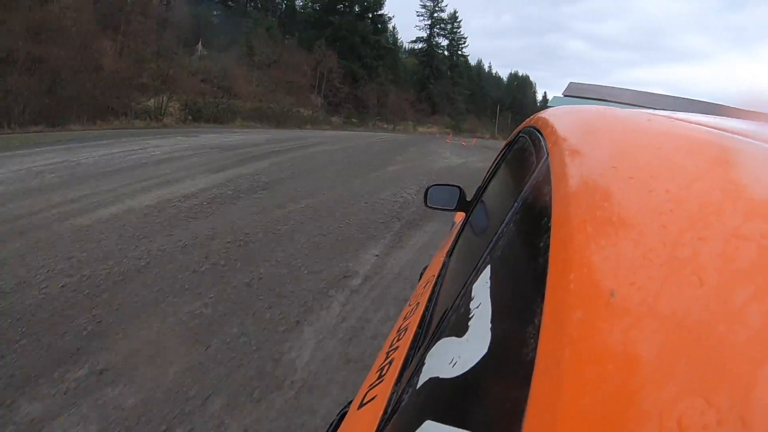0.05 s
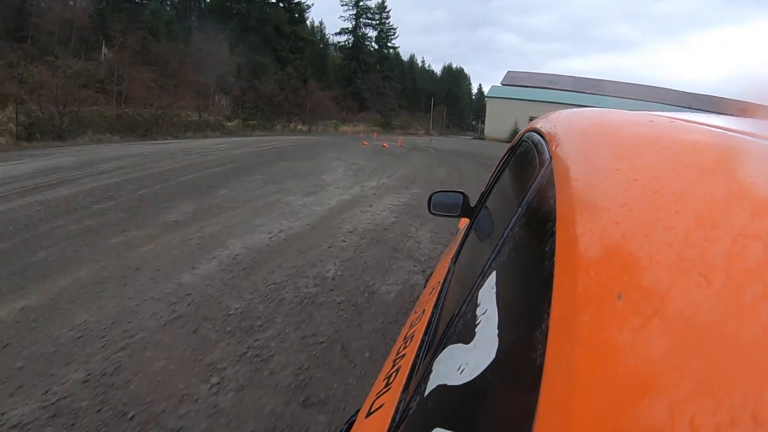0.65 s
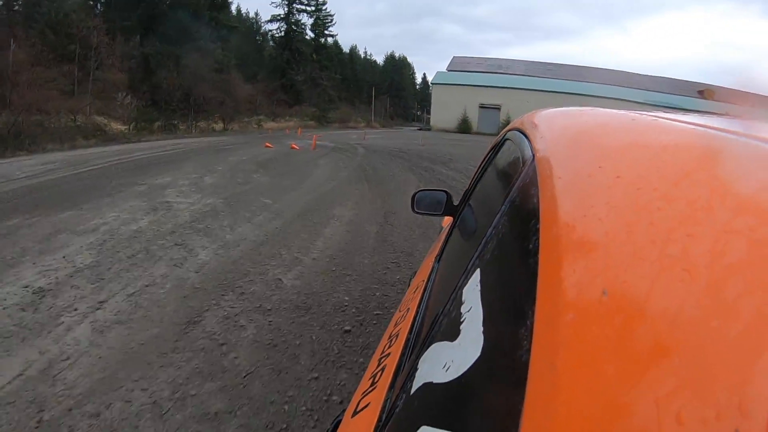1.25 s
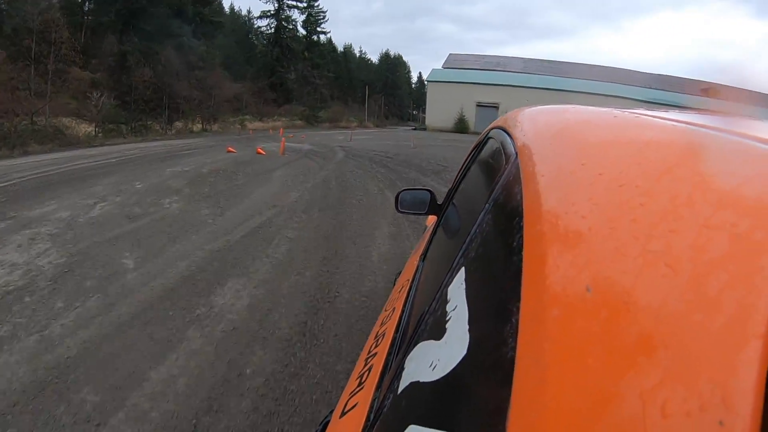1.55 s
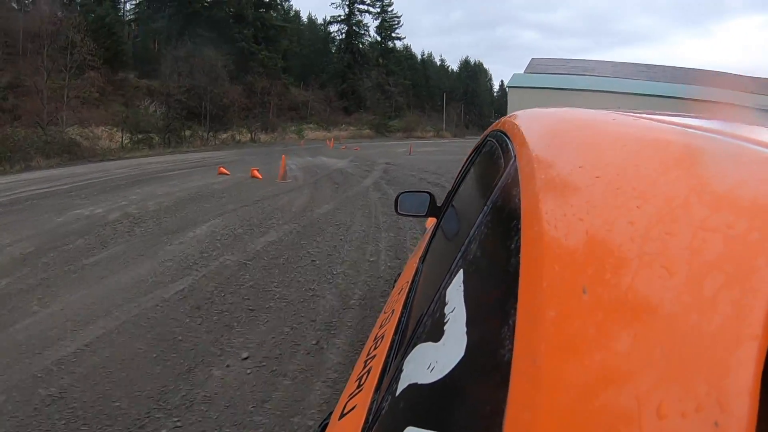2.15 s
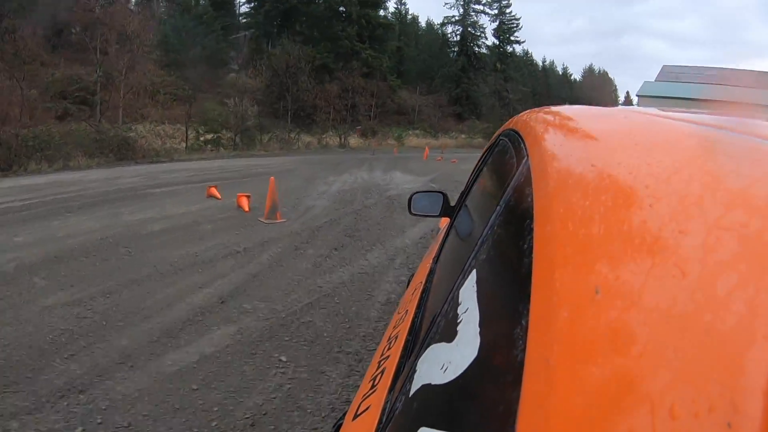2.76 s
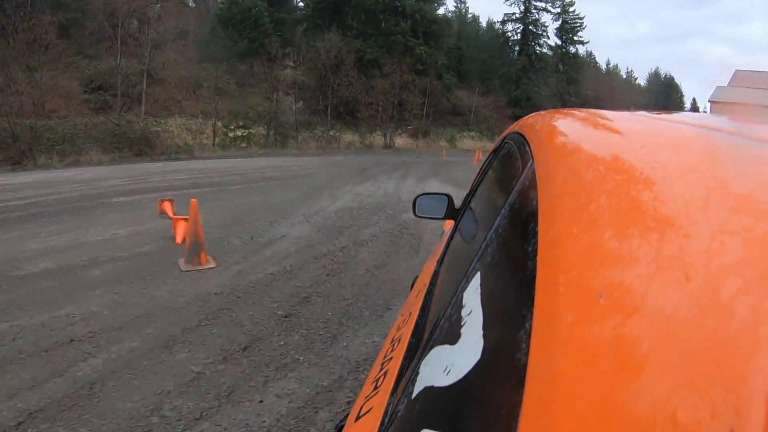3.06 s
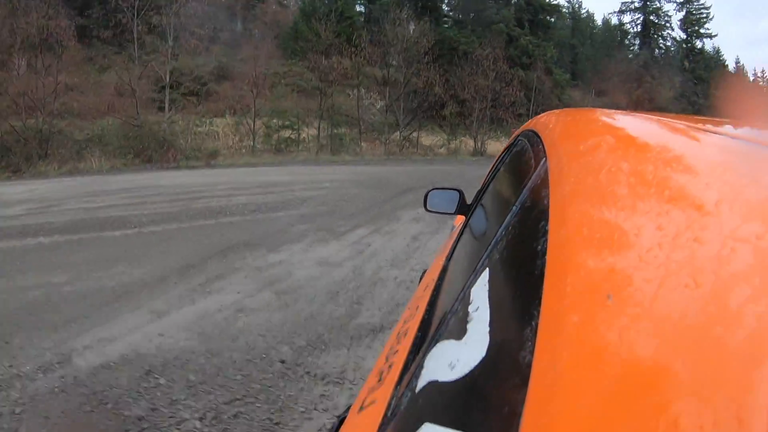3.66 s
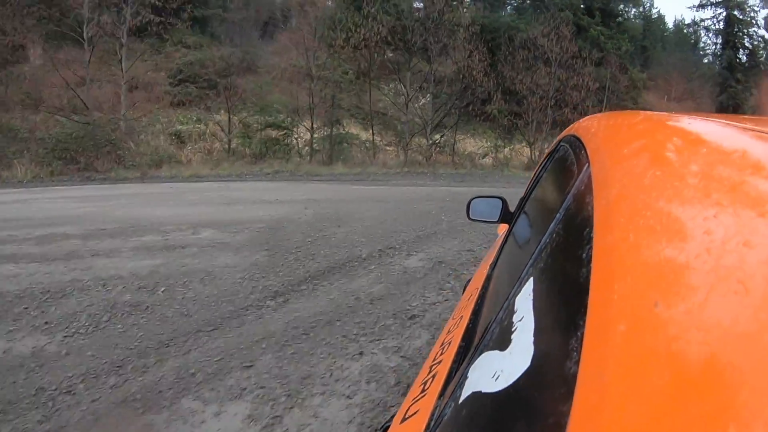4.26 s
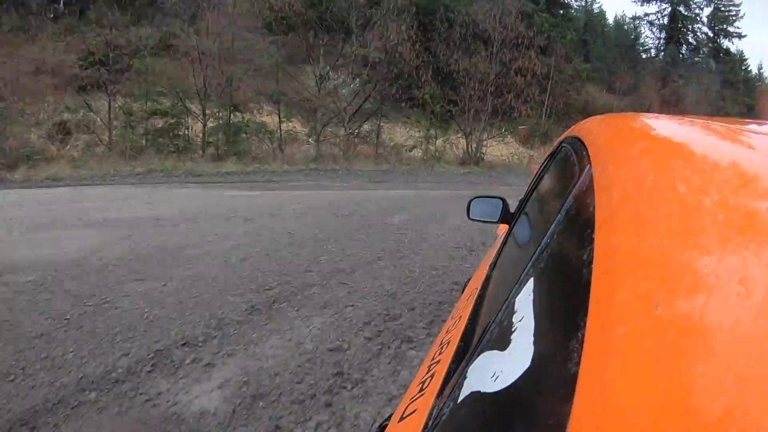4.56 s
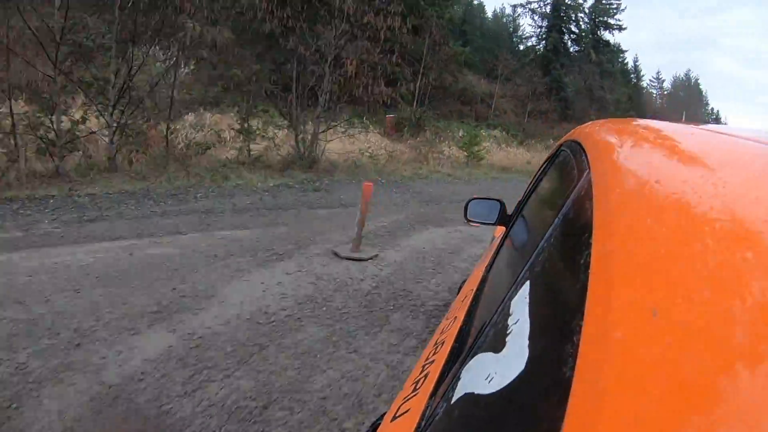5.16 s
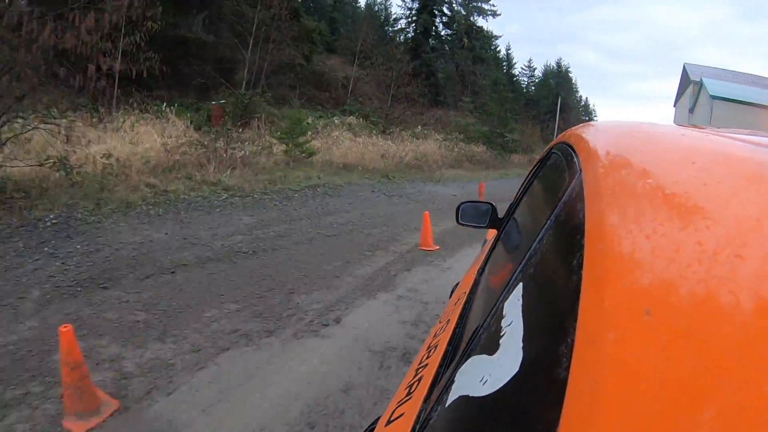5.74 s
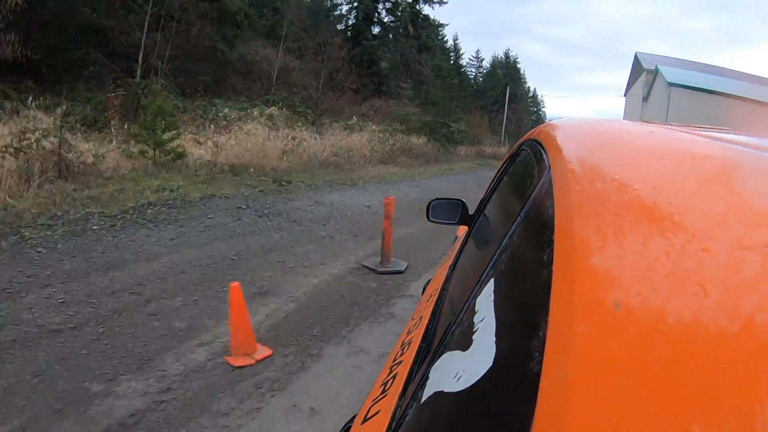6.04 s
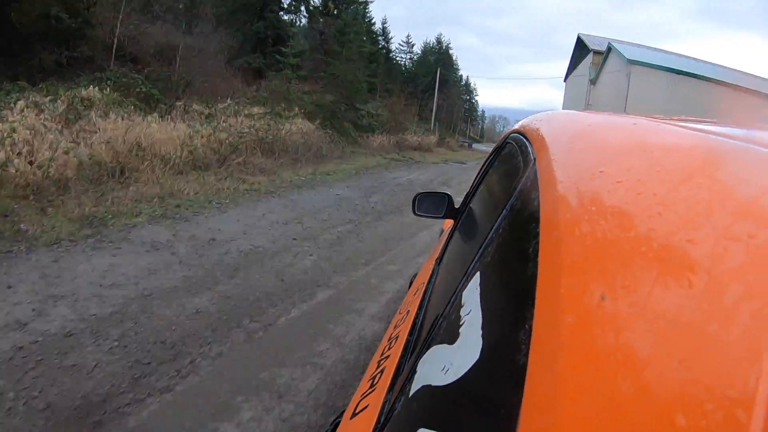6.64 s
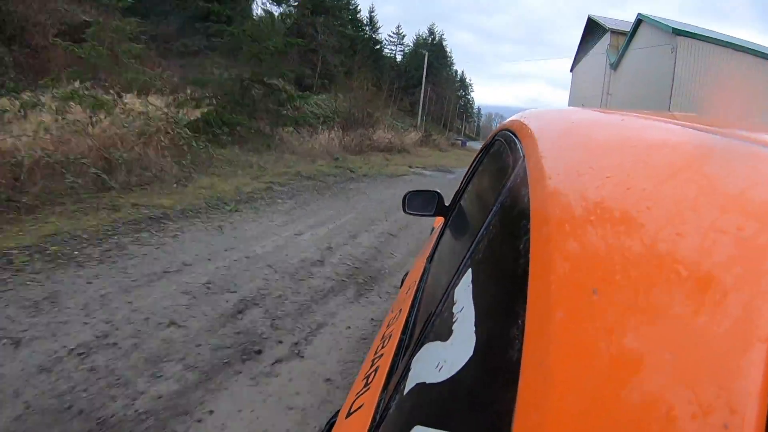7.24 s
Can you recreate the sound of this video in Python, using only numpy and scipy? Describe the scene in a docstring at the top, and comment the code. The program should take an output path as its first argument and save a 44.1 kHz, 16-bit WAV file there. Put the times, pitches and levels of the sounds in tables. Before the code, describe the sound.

Heavy wind rumble nearly buries a car's engine as its tyres roar through gravel, stones hit the body and the brakes squeal twice.

```python
"""Wind rumbles and slaps at a microphone on the side of a rally car's roof, nearly burying the engine.
The car is sliding round a wet gravel lot: rough ground makes its body drone, and ruts make it thud.
The tyres roar, crunch the gravel, spray grit and fling stones that crack against the panels.
Twice, as the car slows for a bend, a brake pad sticks and slips on its disc and squeals."""
import sys
import numpy as np
from scipy import signal
from scipy.fft import rfft, irfft
from scipy.io import wavfile
from scipy.ndimage import uniform_filter1d, minimum_filter1d

SR = 44100
rng = np.random.default_rng(int(sys.argv[2]) if len(sys.argv) > 2 else 0)


def to_wav(sig):
    """Store sig (one row per channel, or 1-D mono) as 16-bit WAV at the path in sys.argv[1].

    Samples outside -1..1 are clipped; the rate is SR.
    """
    pcm = np.clip(np.atleast_2d(sig), -1, 1) * 32767
    pcm = np.round(pcm).astype(np.int16)
    wavfile.write(sys.argv[1], SR, pcm.T)  # frames by channels


N = 330750
TIME = np.arange(N) / SR

# Levels in all tables are relative: the functions add their own gains.
# how hard the car is driven, given as the level of its roar: (time [s], level [dB])
CAR_PACE = [(0, -29.5), (0.3, -30), (0.6, -27.5), (1.3, -36), (1.7, -50), (2.05, -42.5), (2.4, -44.5),
            (2.8, -34.5), (3.3, -34), (4.1, -40), (4.6, -44.5), (5.45, -32), (5.85, -37.5), (6.25, -34),
            (7.1, -29.5), (7.5, -25)]
# the tyres slide sideways: (middle time [s], half width [s], level [dB])
TYRE_SLIDES = [(.95, 0.46, -44), (2.95, 0.29, -43), (5.47, 0.08, -34.5), (6.18, 0.11, -37),
               (7.45, 0.47, -37.5)]
# fine wet grit thrown by the tyres: (time [s], level [dB])
SPRAY_LEVEL = [(0, -50.5), (.4, -57.5), (.62, -54.5), (1.1, -64), (1.6, -65.5), (2.25, -64.5), (3, -53.5),
               (3.6, -59), (3.92, -53.5), (4.65, -60.5), (5.25, -56.5), (5.36, -51), (5.62, -51),
               (5.85, -55), (6.25, -49), (6.55, -53), (7.15, -50), (7.5, -48)]
# coarse gravel grinding under the tyres: (time [s], level [dB])
GRIND_LEVEL = [(0, -44.5), (.55, -49), (1.7, -66), (2.6, -54.5), (3.9, -54), (4.65, -59), (5.9, -47.5),
               (6.3, -45), (7.5, -38)]
# the sharp crack and the dull knock of a stone on the body: (frequency [Hz], level [dB])
CRACK_SPECTRUM = [(1000, -37.5), (3300, -3), (4300, 8), (6200, 0.5), (7200, -27), (9000, -42.5),
                  (12000, -55.5)]
KNOCK_SPECTRUM = [(400, -13.5), (1200, 10.5), (2000, 8), (3200, -11), (4300, -14), (6000, -15.5),
                  (8000, -54.5)]
# one table for each brake squeal: (time [s], pitch [Hz], level [dB], overtone boost [dB])
BRAKE_SQUEALS = [
    [(1.19, 1990, -56.5, 2), (1.26, 1960, -44, 0), (1.325, 1980, -47.5, 5), (1.36, 2009, -40.5, -9),
     (1.415, 1978, -36, -10), (1.43, 1980, -56, 8), (1.455, 1982, -40, -6), (1.505, 1968, -33, -8),
     (1.565, 1992, -37.5, -4), (1.605, 1960, -34.5, 0.5), (1.63, 1970, -35, -8), (1.66, 1962, -35.5, -9),
     (1.675, 1937, -43, 3), (1.695, 1974, -37, -2), (1.755, 1973, -33, -4.5), (1.79, 1970, -29.5, -11),
     (1.812, 1968, -29.5, 0), (1.832, 1955, -43, 13), (1.842, 1962, -44, -16), (1.865, 1967, -55, -11)],
    [(3.83, 1950, -57, 3), (3.86, 1964, -45, 3), (3.904, 1983, -39, -4), (3.95, 2024, -42.5, -6),
     (3.975, 2050, -49, -6), (4.036, 2055, -45, -3), (4.085, 2080, -57, -2)],
]
# air beating on the microphone: (frequency [Hz], level [dB])
BUFFET_SPECTRUM = [(60, -7.5), (150, -4), (260, 1.5), (400, -2.5), (600, -7.5), (850, -17), (1300, -25),
                   (2200, -50), (4000, -69.5), (8000, -87)]
# hard slaps of wind: (time [s], spit level [dB], thump level [dB])
WIND_SLAPS = [(0.071, -17.5, -27), (0.152, -23, -3), (.196, -18, -24), (0.333, -16, -1), (0.554, -18, -20),
              (0.645, -16, -8), (.737, -23, -24), (1.237, -20, -12.5), (1.26, -24, -18),
              (2.042, -25.5, -13.5), (2.101, -30, -19), (2.352, -27, -23.5), (2.51, -25, -20),
              (2.585, -26, -19), (2.832, -16.5, -16), (2.913, -18, -17), (3.014, -20, -13),
              (3.149, -20, -12), (3.175, -20, -12), (3.194, -16, -6), (3.204, -17, -20), (3.237, -22, -11),
              (3.558, -20, -26), (3.617, -17, -8.5), (3.684, -16, -10), (3.715, -20, -18.5),
              (3.806, -18, -13), (3.83, -20.5, -13), (3.901, -20.5, -10), (4.017, -18, -13.5),
              (4.086, -15.5, -9.5), (4.171, -23, -12.5), (4.22, -21, -18), (4.323, -22, -26),
              (4.465, -30, -21), (4.914, -41, -14.5), (4.975, -22.5, -19.5), (4.994, -27, -18),
              (5.069, -31, -21), (5.137, -27, -22), (5.182, -19, -18), (5.232, -27, -15),
              (5.663, -11, -8.5), (5.701, -31, -11), (5.767, -18, -16.5), (6.044, -20, -12),
              (6.102, -14.5, -13.5), (6.373, -22.5, -16), (6.397, -25, -15), (6.518, -8.5, -8),
              (6.905, -19, -7), (6.93, -20, -19), (7.418, -14, -22)]


def gain_of(db):
    """Turns decibels into a factor to multiply a sound by."""
    return np.exp(np.asarray(db) * np.log(10) / 20)


def evened(x):
    """Scales a signal to an average strength (rms) of 1."""
    return x / np.sqrt(np.mean(x ** 2) + 1e-20)


def curves(rows):
    """Joins the points in each column of a table with straight lines over time."""
    times, *columns = np.transpose(rows)
    return [np.interp(TIME, times, column) for column in columns]


def humps(rows):
    """A gain with bell-shaped swells, from rows of (middle time [s], half width [s], level [dB])."""
    return sum(gain_of(db) * np.exp(-((TIME - s) / half_s) ** 2 / 2) for s, half_s, db in rows)


def add(mix, start_s, sound):
    """Mixes a sound in at the given time."""
    part = mix[max(round(start_s * SR), 0):][:len(sound)]
    part += sound[:len(part)]


def coloured(x, spectrum):
    """Shapes the lows and highs of x by rows of (frequency [Hz], level [dB])."""
    hz, db = np.transpose(spectrum)
    bin_hz = np.fft.rfftfreq(len(x), 1 / SR)
    bin_db = np.interp(np.log(bin_hz + 1), np.log(hz), db)
    return irfft(rfft(x) * gain_of(bin_db), len(x))


def noise(spectrum):
    """Steady noise of strength 1 with the given spectrum."""
    return evened(coloured(rng.standard_normal(N), spectrum))


def wander(slow_hz, fast_hz, size=16384):
    """A random drift of strength 1 that moves mostly between two rates."""
    hz = np.fft.rfftfreq(size, TIME[-1] / size)
    shape = hz / (hz + slow_hz) / np.sqrt(hz + slow_hz) / (1 + (hz / fast_hz) ** 2)
    drift = irfft(rfft(rng.standard_normal(size)) * shape, size)
    return np.interp(TIME, np.linspace(0, TIME[-1], size), evened(drift))


def flutter(drift, depth_db):
    """A wobbling gain that follows a drift, with its biggest swings held back."""
    return evened(gain_of(depth_db * 2 * np.tanh(drift / 2)))


def ticks(per_s, decay_s, spread_db=3):
    """Dry, noisy ticks at random moments, most faint and a few loud."""
    hits = (rng.random(N) < per_s / SR) * gain_of(spread_db * np.minimum(rng.exponential(1, N), 2.5))
    fades = signal.lfilter([1], [1, -np.exp(-1 / (decay_s * SR))], hits)
    return fades * rng.standard_normal(N)


def pebbles(per_s, low_hz, high_hz, ring_s, sizes=14):
    """Pebbles click at random moments, equally loud, each at a pitch set by its size."""
    t = np.arange(256) / SR
    starts = np.flatnonzero(rng.random(N) < per_s / SR)
    pitches = np.geomspace(low_hz, high_hz, sizes)[:, None]
    rings = np.sin(2 * np.pi * pitches * t) * (t / ring_s) * np.exp(-t / ring_s)
    size = rng.integers(0, sizes, len(starts))
    clicks = (-1.) ** starts[:, None] * rings[size]  # about half are flipped upside down
    positions = starts[:, None] + np.arange(len(t))
    return np.bincount(positions.ravel(), clicks.ravel(), N)[:N]


def body_drone(level_db=-1.5):
    """Rough ground shakes the hollow body of the car."""
    # how loudly the body drones: (time [s], level [dB])
    drone_level = [(0, -25), (.75, -21.5), (1.5, -23.5), (2.35, -22.5), (2.8, -19.5), (3.4, -18),
                   (4.35, -21.5), (4.8, -27), (5.1, -23), (5.5, -26), (6.2, -29), (6.85, -19.5),
                   (7.5, -20.5)]
    # its hollow tone: (frequency [Hz], level [dB])
    shell_spectrum = [(60, -35.5), (110, -11), (150, -2), (180, 0), (235, -6.5), (300, -23), (500, -46.5),
                      (1200, -91)]
    level, = curves(drone_level)
    return gain_of(level + level_db) * noise(shell_spectrum)


def bumps(rise_s=0.0055, sag=0.76):
    """Each rut gives the body one heavy, short thud that falls in pitch."""
    # the wheels drop into ruts: (time [s], level [dB], pitch halfway through its fall [Hz])
    ruts = [(0.045, -14, 70), (0.966, -14, 142.5), (1.595, -11.5, 115), (4.69, -20, 111),
            (5.003, -16, 136.1), (5.21, -24, 143), (5.646, -14, 105), (5.701, -12, 85), (5.823, -13.5, 115),
            (5.921, -14.5, 140), (6.228, -11, 107), (6.295, -14, 100), (6.53, -26, 84)]
    out, t = np.zeros(N), np.arange(6144) / SR
    age = t / rise_s
    envelope = np.sqrt(2) * age * np.exp(1 - age)
    for s, db, hz in ruts:
        cycles = np.cumsum(hz * (1 + sag * (np.exp(-age / 2) - .5))) / SR
        add(out, s, gain_of(db) * envelope * np.sin(2 * np.pi * (cycles + rng.random())))
    return out


def engine(level_db=0.5, waver=0.011, rough_db=3.2):
    """The exhaust hums at multiples of the firing rate, made a little unsteady by the passing air."""
    # the engine's revs: (time [s], firing rate [Hz], level [dB])
    revs = [(0, 82.85, -15.5), (.5, 85.2, -31.5), (1.05, 78.46, -26), (1.5, 84.74, -29), (2, 84.2, -25),
            (2.7, 86.15, -32.5), (3.6, 75.54, -35.5), (4.45, 62.8, -26.5), (4.9, 73, -25.5),
            (5.4, 80.2, -23.5), (5.7, 84.8, -37.5), (6.1, 96.2, -26.5), (6.8, 107.8, -28),
            (7.5, 117.5, -23.5)]
    # exhaust tones, with half steps from unequal cylinders: (multiple of firing rate, level [dB])
    exhaust_tones = [(.5, -3), (1, 12), (1.5, -8.5), (2, 0.5), (2.5, -24.5), (3, -8), (4, -24), (5, -33),
                     (6, -7)]
    hz, level = curves(revs)
    cycles = np.cumsum(hz * (1 + waver * wander(slow_hz=1.2, fast_hz=5.5))) / SR
    note = np.zeros(N)
    for multiple, db in exhaust_tones:
        gain = gain_of(db + 0.47 * wander(slow_hz=1.1, fast_hz=3.0))
        note += gain * np.cos(2 * np.pi * (multiple * cycles + rng.random()))
    uneven_burning = flutter(wander(slow_hz=8.3, fast_hz=35), rough_db)
    return gain_of(level + level_db) * evened(note) * uneven_burning


def tyres(roll_db=-9, slide_db=4.0):
    """The treads roar with the pace of the car, and louder as they slide over packed gravel."""
    # the roar of the treads: (frequency [Hz], level [dB])
    tread_spectrum = [(200, -19.5), (550, -3.5), (850, 6), (1300, -1.5), (1900, -15.5), (2600, -22.5),
                      (4000, -36), (9000, -78.5)]
    pace, = curves(CAR_PACE)
    gain = np.hypot(gain_of(pace + roll_db), gain_of(slide_db) * humps(TYRE_SLIDES))
    return gain * noise(tread_spectrum) * flutter(wander(slow_hz=3.8, fast_hz=50), depth_db=1.0)


def gravel(spray_db=-3.5, hiss_db=-0.5, grind_db=3.5, slide_db=-11):
    """Fine pebbles patter in handfuls over a wet hiss; coarse stones crunch under the tyres."""
    # fine grit and coarse gravel: (frequency [Hz], level [dB])
    grit_spectrum = [(1500, -26.5), (3400, -10), (4100, -1), (4900, -4.5), (5800, -9), (6400, -12),
                     (7000, -21), (8300, -26.5), (9500, -37), (12000, -65)]
    crunch_spectrum = [(300, -24), (900, -6.5), (1900, -1.5), (2500, -8), (3300, -15), (4200, -10),
                       (6000, -22), (7200, -38), (11000, -78)]
    # the treads crush a loose patch: (middle time [s], half width [s], level [dB])
    crushed_patches = [(.515, 0.0068, -38.5), (.587, 0.0043, -29.5), (2.908, 0.016, -43.5),
                       (3.34, 0.021, -39.5), (3.41, 0.009, -44), (5.443, 0.0063, -31.5),
                       (5.556, 0.0066, -34), (6.205, 0.013, -35), (6.32, 0.013, -36),
                       (6.487, 0.0071, -31.5), (6.63, 0.01, -32.5), (6.758, 0.0089, -29.5),
                       (7.33, 0.0069, -34)]
    (spray_level,), (grind_level,) = curves(SPRAY_LEVEL), curves(GRIND_LEVEL)
    small = pebbles(per_s=1400, low_hz=3200, high_hz=6900, ring_s=0.00013)
    large = pebbles(per_s=1600, low_hz=1020, high_hz=4140, ring_s=0.00052)
    clumps = wander(slow_hz=0.93, fast_hz=65)  # loose patches throw up both sizes at once
    handfuls = wander(slow_hz=15, fast_hz=40)
    spray = evened(coloured(small, grit_spectrum)) * flutter(clumps, depth_db=6.5)
    crunch = evened(coloured(large, crunch_spectrum)) * flutter(evened(clumps + handfuls), depth_db=3)
    hiss = gain_of(hiss_db) * noise(grit_spectrum)
    fine = (gain_of(spray_db) * spray + hiss) * flutter(handfuls, depth_db=1.0)
    digging_in = gain_of(slide_db) * humps(TYRE_SLIDES)
    grinding = np.hypot(gain_of(grind_level + grind_db), digging_in)
    return gain_of(spray_level) * fine + np.hypot(grinding, humps(crushed_patches)) * crunch


def grit_fans():
    """A spinning wheel throws a fan of grit that sizzles along the side of the car."""
    # a wheel spins up: (middle time [s], half width [s], level [dB])
    wheelspins = [(.68, 0.22, -55), (5.38, 0.046, -48.5), (5.59, 0.061, -51)]
    # the sizzle: (frequency [Hz], level [dB])
    sizzle_spectrum = [(3000, -31.5), (4300, -0.5), (5100, 2.5), (6300, -11.5), (7100, -28.5), (9500, -44)]
    return humps(wheelspins) * evened(coloured(ticks(per_s=940, decay_s=0.00093), sizzle_spectrum))


def chips(chip_db=-7, knock_db=-1):
    """Small stones in the spray tick against the panels; coarse ones knock in the wheel arches."""
    (spray_level,), (grind_level,) = curves(SPRAY_LEVEL), curves(GRIND_LEVEL)
    small = evened(coloured(ticks(per_s=45, decay_s=.0012), CRACK_SPECTRUM))
    coarse = evened(coloured(ticks(per_s=35, decay_s=.0018), KNOCK_SPECTRUM))
    return gain_of(spray_level + chip_db) * small + gain_of(grind_level + knock_db) * coarse


def stones(crack_db=2, knock_db=10, splinter_db=13, ring_db=3):
    """Each stone cracks on a panel with a brief ring and a dull knock; close ones splinter brightly."""
    # stones hit the body: (time [s], crack [dB], knock [dB], splinter [dB], ring pitch [Hz])
    strikes = [(.046, -41, -34, -80, 3950), (0.054, -32, -36, -82, 4640), (0.089, -34, -45, -71, 5750),
               (.1166, -42, -47, -80, 4950), (.193, -44, -32, -77, 4830), (0.275, -40, -33.5, -82, 4740),
               (0.371, -36, -60, -62, 5190), (0.4556, -36.5, -40, -74, 4300),
               (0.467, -29.5, -35, -83, 4390), (0.497, -35, -31, -80, 4310), (0.514, -32, -33.5, -74, 4800),
               (0.565, -28, -33, -79, 4440), (0.6338, -38, -36, -76, 4300), (0.6505, -38, -46, -63, 5040),
               (.68, -40, -34, -80, 4480), (0.7365, -38, -38, -76, 4590), (0.759, -40, -40.5, -79, 3830),
               (.797, -45, -33, -80, 3980), (.845, -43, -35, -80, 4060), (0.9103, -44, -30, -76, 4540),
               (1.053, -48, -42, -84, 3700), (1.07, -45, -35.5, -84, 4330), (1.0843, -40, -39, -83, 4800),
               (1.14, -46, -54, -84, 4870), (1.229, -45, -42, -83, 3790), (1.265, -46, -42, -84, 4030),
               (1.342, -49, -33.5, -80, 3830), (1.3686, -48, -38.5, -82, 3940),
               (1.388, -44, -52, -80, 5250), (1.681, -37, -46, -53, 3920), (2.052, -50, -44, -86, 4010),
               (2.103, -54, -42, -84, 4240), (2.509, -49, -37, -81, 4000), (2.8635, -39, -50, -66, 4310),
               (2.943, -37, -55, -74, 4480), (3.0394, -39, -54, -58, 4870), (3.06, -39, -55, -76, 4970),
               (3.234, -37, -43, -73, 4750), (3.339, -50, -38, -78, 3790), (3.385, -40, -35, -76, 4630),
               (3.415, -41, -37, -81, 5280), (3.438, -42, -42, -69, 4460), (3.612, -40.5, -45, -81, 4520),
               (3.821, -47, -55, -58, 4900), (3.832, -43, -42, -78, 4120), (3.9913, -43, -37, -51, 5790),
               (4.172, -38, -41, -80, 4290), (4.807, -42, -53, -81, 4180), (4.9016, -40, -53, -58, 5250),
               (5.017, -38, -48, -77, 4610), (5.916, -47, -34, -69, 4070), (6.1766, -39, -38, -63, 4390),
               (6.2, -42, -33, -74, 4290), (6.2458, -34, -41, -70, 4760), (6.5269, -35, -33, -58, 4330),
               (6.7755, -30.5, -43, -75, 4590), (6.847, -27, -28.5, -72, 4180),
               (6.897, -30.5, -30.5, -66, 4590), (7.032, -32, -34, -74, 3710), (7.107, -29, -29, -76, 3960),
               (7.172, -39, -42, -75, 3750), (7.188, -38, -46, -74, 4800), (7.213, -31, -42, -70, 4160),
               (7.287, -31, -42, -72, 4220), (7.2988, -33, -33, -67, 4160), (7.344, -29, -36, -67, 4690),
               (7.435, -30, -40, -70, 4430)]
    # the bright splinter: (frequency [Hz], level [dB])
    splinter_spectrum = [(2000, -23), (5000, -1.5), (8000, 1.5), (10000, -9), (12000, -29.5)]
    # the three parts of a hit: (spectrum, decay time [s], boost [dB])
    parts = [(CRACK_SPECTRUM, .002, crack_db), (KNOCK_SPECTRUM, .006, knock_db),
             (splinter_spectrum, .0005, splinter_db)]
    out, t = np.zeros(N), np.arange(2048) / SR
    middle = len(t) // 2  # hits sit mid-buffer, so the filter has room on both sides
    for s, *levels, ring_hz in strikes:
        ring = signal.iirpeak(ring_hz, Q=9, fs=SR)
        for db, (spectrum, decay_s, boost_db) in zip(levels, parts):
            blow = rng.standard_normal(len(t)) * np.exp(-t / decay_s)
            ringing = blow + gain_of(ring_db) * signal.lfilter(*ring, blow)
            hit = coloured(np.roll(ringing, middle), spectrum)
            add(out, s - middle / SR, gain_of(db + boost_db) * hit / abs(hit).max())
    return out


def brake_rub(level_db=-48, fade_db_per_s=41.5):
    """After the first squeal the pad scrapes the disc in faint, broken touches and fades."""
    # the narrow, whistling scrape: (frequency [Hz], level [dB])
    rub_spectrum = [(1500, -41.5), (1850, -1), (1970, 0.5), (2080, -4.5), (2500, -58)]
    age = TIME - BRAKE_SQUEALS[0][-1][0]
    touches = flutter(wander(slow_hz=15, fast_hz=60), depth_db=5)
    return (age > 0) * gain_of(level_db - fade_db_per_s * abs(age)) * noise(rub_spectrum) * touches


def brake_squeals(jitter=0.0044, firm_db=-37, main_rasp_rad=0.042, overtone_rasp_rad=.41):
    """The pad sticks and slips on the disc: one wavering tone with rasping overtones."""
    # the tones of the disc: (multiple of the pitch, level [dB])
    disc_tones = [(1, 4.5), (2, -14.8), (3, -27.5), (4, -50)]
    out = np.zeros(N)
    for squeal in BRAKE_SQUEALS:
        hz, level, overtone_boost = curves(squeal)
        cycles = np.cumsum(hz * (1 + jitter * wander(slow_hz=38.8, fast_hz=400))) / SR
        touching = (TIME > squeal[0][0]) & (TIME < squeal[-1][0])
        stutter_db = 1.1 + .3 * np.clip(firm_db - level, 0, 10)  # a light touch stutters more
        for multiple, db in disc_tones:
            chatter = wander(slow_hz=11.0, fast_hz=90)
            if multiple == 1:
                grip, rasp = flutter(chatter, stutter_db), main_rasp_rad
            else:
                grip, rasp = gain_of(overtone_boost) * flutter(chatter, depth_db=4.4), overtone_rasp_rad
            slips = rasp * wander(slow_hz=60, fast_hz=159)  # uneven slips roughen the tone
            tone = np.sqrt(2) * np.sin(2 * np.pi * multiple * cycles + slips)
            out += touching * grip * gain_of(level + db) * tone
    return out


def rushing_air(pace, dull_db=-46, bright_db=-36):
    """Passing air sounds dull when the car is slow and bright when it is fast."""
    # fast air and slow air: (frequency [Hz], level [dB])
    bright_spectrum = [(250, -19), (550, 2.5), (900, 1), (1300, -3.5), (1850, -8.5), (2300, -19),
                       (3000, -25), (4200, -35.5), (6000, -37), (7200, -61.5), (11000, -91.5)]
    dull_spectrum = [(250, -21.5), (550, 6), (900, -3.5), (1300, -14.5), (1850, -10.5), (2300, -25),
                     (3000, -36), (4200, -46), (6000, -49.5), (11000, -100)]
    brightness = np.clip((pace - dull_db) / (bright_db - dull_db), 0, 1)
    return np.sqrt(brightness) * noise(bright_spectrum) + np.sqrt(1 - brightness) * noise(dull_spectrum)


def lulls(lead_s=0.016, half_width_s=0.0023):
    """The air slackens just before each slap: a curve that rises from 0 to 1 at those moments."""
    out, t = np.zeros(N), np.arange(-2048, 2048) / SR
    for s, *_ in WIND_SLAPS:
        add(out, s - lead_s + t[0], np.exp(-(t / half_width_s) ** 2))
    return out


def slaps(spit_db=2, low_db=1.0, rise_s=0.00068, swing_s=0.0017):
    """One strong swirl of air bursts on the microphone: suction flips to a push, and the front spits."""
    # the spitting front: (frequency [Hz], level [dB])
    spit_spectrum = [(250, -20), (550, 1), (900, 2), (1300, -2.5), (1900, -7.5), (2400, -19), (3000, -29),
                     (4200, -36), (6000, -42), (7200, -63.5), (11000, -92.5)]
    out, t = np.zeros(N), np.arange(-1024, 1024) / SR
    age = np.maximum(t, 0) / rise_s
    push = t * np.exp(-(t / swing_s) ** 2 / 2)
    for s, spit_level, thump_level in WIND_SLAPS:
        spit = coloured(age * np.exp(-age) * rng.standard_normal(len(t)), spit_spectrum)
        thump = coloured(age * np.exp(-age / 2) * rng.standard_normal(len(t)), BUFFET_SPECTRUM)
        low_level = thump_level + low_db
        for part, db in (spit, spit_level + spit_db), (thump, low_level), (push, low_level):
            add(out, s + t[0], gain_of(db) * part / abs(part).max())
    return out


def wind(gust_db=-1.5, calm_db=-30, rumble_db=-21, buffet_db=2.0, rush_db=-34.13, lull_db=-1.0):
    """Swirls of air buffet the microphone, with slow gusts and a rumble and rush that grow with pace."""
    # how hard the air buffets: (time [s], level [dB])
    airflow = [(0, -24), (.4, -23.5), (1.05, -28), (1.3, -25), (1.7, -31.5), (2.05, -28), (2.45, -30.5),
               (2.85, -23), (3.08, -29), (3.25, -20.5), (3.7, -28.5), (4.2, -27.5), (4.65, -37),
               (5.15, -33), (5.8, -28.5), (6.35, -24.5), (6.8, -20), (7.5, -23.5)]
    # big slow gusts: (middle time [s], half width [s], level [dB])
    gusts = [(.35, 0.15, -25), (.82, 0.061, -24.5), (1.2, 0.033, -24), (1.97, 0.096, -18),
             (3.65, 0.042, -22), (4.18, 0.15, -23), (5.12, 0.085, -31), (5.57, 0.059, -21),
             (5.92, 0.056, -20.5), (6.11, 0.032, -17), (6.24, 0.038, -19), (6.39, 0.025, -19),
             (6.92, 0.12, -20)]
    # the deep rumble and the even deeper surge of the gusts: (frequency [Hz], level [dB])
    rumble_spectrum = [(15, -29), (40, -12), (58, 1), (100, -0.5), (130, -1), (200, -15.5), (400, -47),
                       (1000, -100)]
    surge_spectrum = [(8, -41), (16, -17.5), (26, -2), (38, -3.5), (50, 0.5), (70, -17.5), (150, -57),
                      (400, -101)]
    (buffet_level,), (pace,) = curves(airflow), curves(CAR_PACE)
    extra_pace = pace + 35  # dB above a middling pace
    pressure = noise(rumble_spectrum)
    rumble_wobble = flutter(wander(slow_hz=6.3, fast_hz=32), depth_db=-2.0)
    rumble = gain_of(rumble_db + .38 * extra_pace) * pressure * rumble_wobble
    surge = (gain_of(calm_db) + gain_of(gust_db) * humps(gusts)) * noise(surge_spectrum)
    swing = abs(pressure) - abs(pressure).mean()  # big pressure swings nudge the swirls
    swirls = evened(wander(slow_hz=3.4, fast_hz=95) + 0.065 * evened(swing))
    buffet = gain_of(buffet_level + buffet_db) * noise(BUFFET_SPECTRUM) * flutter(swirls, depth_db=4.0)
    # small swirls ride on the large ones and make the rush spit
    small_swirls = evened(swirls + 1.6 * wander(slow_hz=2.0, fast_hz=180))
    rush = gain_of(rush_db + .79 * extra_pace) * rushing_air(pace) * flutter(small_swirls, depth_db=5.0)
    return rumble + surge + gain_of(lull_db * lulls()) * (buffet + rush)


def scene():
    """Air, car, gravel and brakes all meet at one microphone."""
    air = wind() + slaps()
    car = body_drone() + bumps() + engine() + tyres()
    loose_ground = gravel() + grit_fans() + chips() + stones()
    return (air + car + loose_ground + brake_squeals() + brake_rub())[None]


def record(dry, threshold_db=-7, hold_samples=200, strength=.7, cutoff_hz=11000):
    """A fast limiter turns down the strongest peaks, then a filter removes the highest treble."""
    needed_gain = np.minimum(1, gain_of(threshold_db) / (abs(dry) + 1e-9))
    held_gain = minimum_filter1d(needed_gain, hold_samples)
    gain = uniform_filter1d(held_gain, hold_samples) ** strength
    lowpass = signal.firwin(255, cutoff_hz, window=("kaiser", 8), fs=SR)
    return signal.oaconvolve(dry * gain, lowpass[None], "same")


dry = scene()
out = record(dry)
to_wav(out)
```